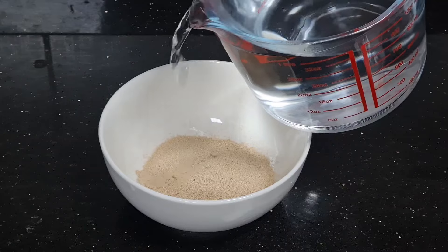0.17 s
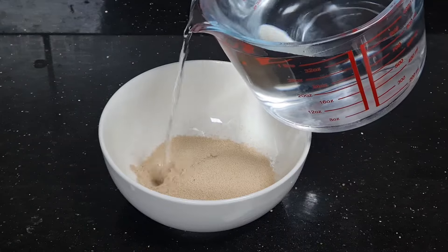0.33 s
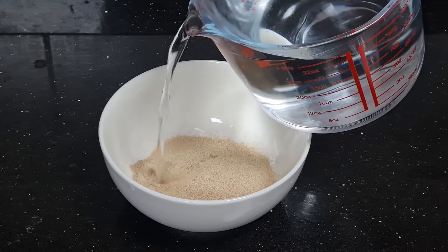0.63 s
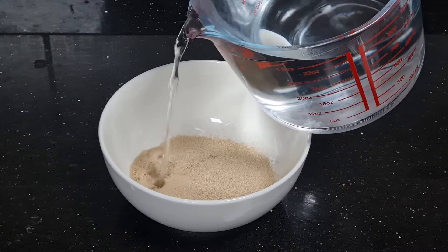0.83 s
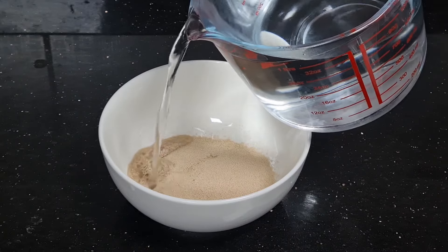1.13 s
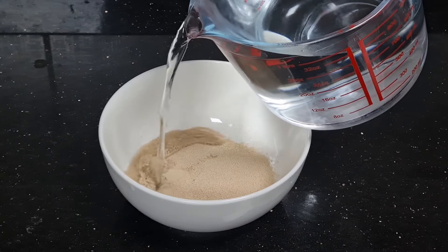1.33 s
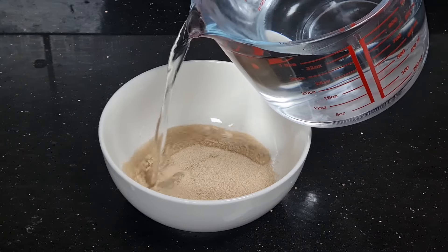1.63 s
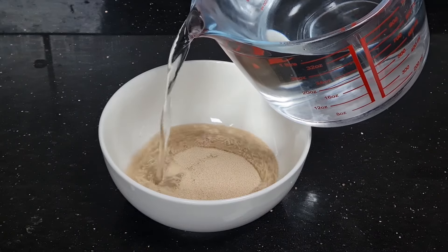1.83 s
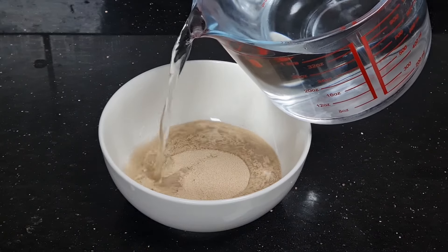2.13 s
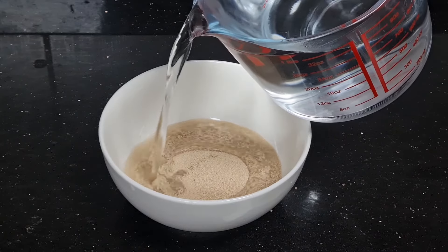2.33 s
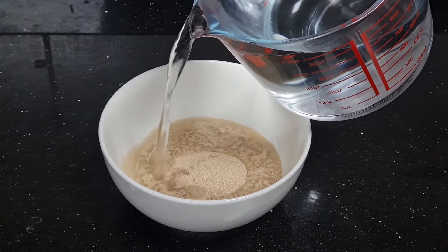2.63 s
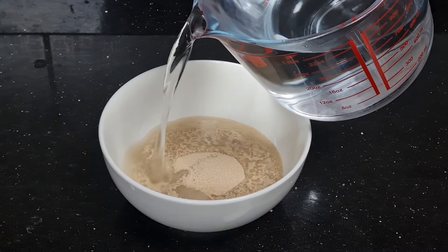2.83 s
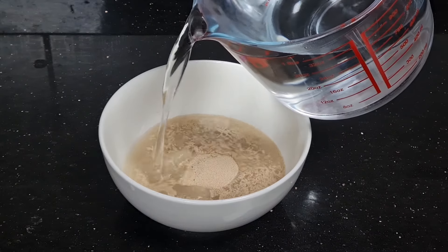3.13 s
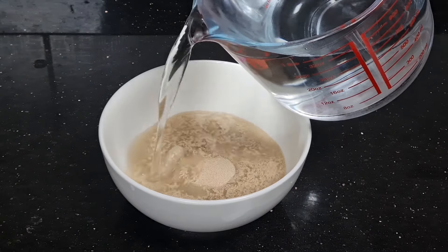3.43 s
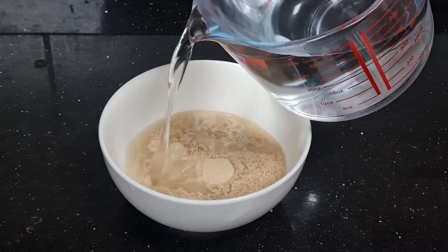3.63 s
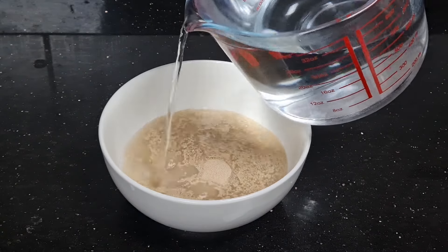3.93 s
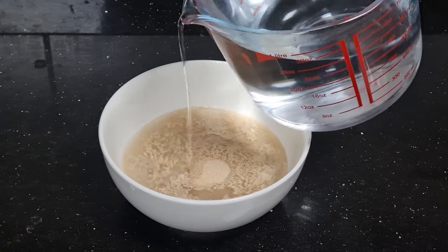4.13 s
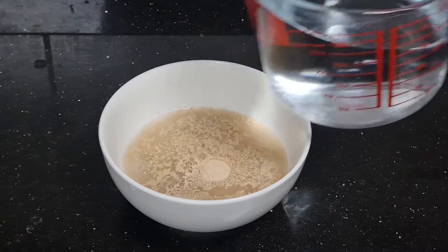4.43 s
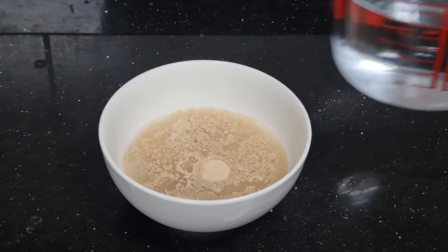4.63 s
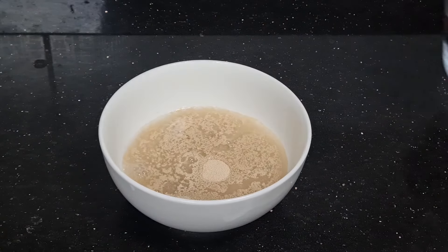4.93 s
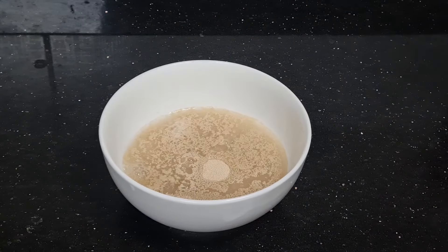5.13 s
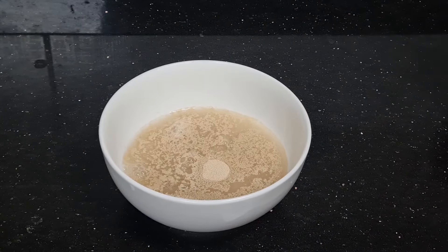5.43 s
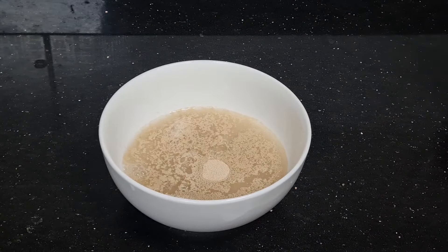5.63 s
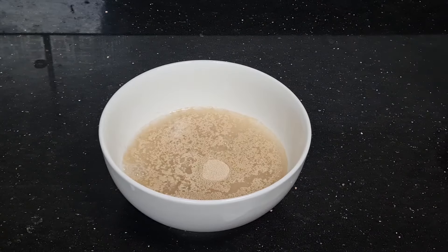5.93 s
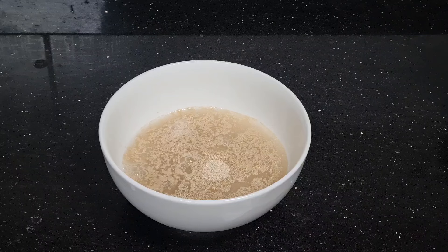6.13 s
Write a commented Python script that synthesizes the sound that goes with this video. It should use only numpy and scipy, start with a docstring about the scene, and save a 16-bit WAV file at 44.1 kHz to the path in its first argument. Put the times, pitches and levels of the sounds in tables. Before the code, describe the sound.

In a quiet kitchen with a low appliance hum, a ceramic bowl gives a short hard clink. A thin stream of water then patters, gurgles and bubbles into it, growing fuller, with a soft bowl knock midway. The pour stops with a few low sloshes. After a pause, a glass jug lands on the stone counter with loud ringing knocks and a gritty scrape. Close stereo microphone, small room.

```python
"""Appliances hum under soft room air: resonated noise and banded noise, all the way through.
A ceramic bowl is knocked at the start and again midway, as decaying modes over a noisy counter knock.
A thin stream of water splats (noise bursts), sprays and gurgles (clicked resonances) and bubbles (rising
sines) in the bowl, with late low surges. Then the glass jug drags and ticks on the stone counter, is set
down with ringing glass modes and rocks. A close pair of microphone ports listens."""
import sys
import numpy as np
from scipy import signal
from scipy.io import wavfile
from scipy.ndimage import uniform_filter1d

SR = 44100
rng = np.random.default_rng(int(sys.argv[2]) if len(sys.argv) > 2 else 0)


def master_out(mix):
    """Clip the mix to full scale and print it as 16-bit PCM to the path in sys.argv[1]."""
    frames = np.transpose(np.atleast_2d(mix))
    ceiling = np.clip(frames, -1, 1)
    pcm = np.round(ceiling * 32767).astype(np.int16)
    wavfile.write(sys.argv[1], SR, pcm)


N = 277036

# how alike the two microphone ports hear each pitch: (f/Hz, likeness 0 to 1)
PORT_LIKENESS = [(40, .998), (170, .985), (350, .65), (700, .35), (1500, .15), (5000, .03)]


def from_db(db):
    """Decibels to amplitude gain."""
    return 10 ** (np.asarray(db) / 20)


def rms_one(x):
    """Scale to rms 1."""
    return x / np.sqrt(np.mean(x ** 2) + 1e-20)


def in_time(rows):
    """Level curves in dB, joined by straight lines; -120 dB outside their span."""
    s, *columns = np.transpose(rows)
    t = np.arange(N) / SR
    return [np.interp(t, s, column, left=-120, right=-120) for column in columns]


def at_hz(points, hz):
    """Read a curve on a log-frequency axis."""
    points = np.array(points)
    return np.interp(np.log(hz), np.log(points[:, 0]), points[:, 1])


def likeness_at(hz):
    """Likeness of the two ports at a pitch, kept between 0 and 1."""
    return np.clip(at_hz(PORT_LIKENESS, hz), 0, 1)


def drift(rate_hz):
    """Slow random wander of rms 1: noise through two equal poles, made at every 40th sample."""
    r = np.exp(-80 * np.pi * rate_hz / SR)
    white = rng.standard_normal(N // 40 + 2002)
    slow = signal.lfilter([1], [1, -2 * r, r * r], white)[2000:]   # drop the filter's run-in
    return np.interp(np.arange(N) / 40, np.arange(len(slow)), rms_one(slow))


def resonance(x, hz, width_hz):
    """Two-pole resonance with a gain of about 1 at its peak."""
    r = np.exp(-np.pi * width_hz / SR)
    zeros = np.array([1, 0, -1]) * (1 - r * r) / 2
    return signal.lfilter(zeros, [1, -2 * r * np.cos(2 * np.pi * hz / SR), r * r], x)


def bandpass(x, low_hz, high_hz):
    """Second-order Butterworth band."""
    return signal.sosfilt(signal.butter(2, [low_hz, high_hz], "band", fs=SR, output="sos"), x)


def pair(mid, side, hz):
    """Left and right from two noises, as alike as the ports hear that pitch."""
    alike = likeness_at(hz)
    return (np.sqrt(1 + alike) * mid + np.sqrt(1 - alike) * side * [[1], [-1]]) / np.sqrt(2)


def banded_noise(spectrum, white, patchy_db):
    """Half-octave bands of two excitations in turn, each with its own level and flicker; rms 1."""
    out = 0
    edges_hz = 23 * 2 ** np.arange(0, 10, .5)
    for k, (low, high) in enumerate(zip(edges_hz, edges_hz[1:])):
        hz = np.sqrt(low * high)
        if spectrum[0][0] < hz < spectrum[-1][0]:
            mid, side = bandpass(white[k % 2], low, high)
            level_db = at_hz(spectrum, hz) + patchy_db * drift(2.13)
            out = out + from_db(level_db) * pair(mid, side, hz)
    return rms_one(out)


def add(out, s, sound, pan_db):
    """Mix a short sound in at a moment; positive pan leans left."""
    i = round(s * SR)
    panned = sound * from_db([[pan_db / 2], [-pan_db / 2]])
    out[:, i:i + sound.shape[-1]] += panned[:, :N - i]


def fading(t60, seconds, rise_s):
    """Envelope with a short rise and an exponential fall of 60 dB per t60."""
    t = np.arange(int(seconds * SR)) / SR
    return (1 - np.exp(-t / rise_s)) * from_db(-60 * t / t60)


def room_tone():
    """Broad air noise in flickering bands, and appliance hums as noise through narrow resonances."""
    # colour of the air: (f/Hz, relative level/dB per Hz)
    air_colour = [(12, -41), (20, -12.5), (48, -9), (63, 6.5), (81, -26), (255, -9.5), (301, -20),
                  (485, -23.5), (574, -24), (1060, -25.5), (1910, -32), (2320, -39.5), (2750, -31.5),
                  (5680, -83.5)]
    # appliance hums: (f/Hz, width of each of two resonances/Hz, rms level/dB)
    hums = [(50.16, 9.5, -45.5), (112, 15.4, -53.5), (163.5, 32, -57.5), (240.9, 17, -53.5),
            (267.8, 9.1, -51.5), (501.5, 10.6, -66.5), (1018, 72, -61.5)]
    air_db = -44.5
    out = from_db(air_db) * banded_noise(air_colour, rng.standard_normal((2, 2, N)), patchy_db=1.4)
    for hz, width_hz, level_db in hums:
        white = rng.standard_normal((2, N))
        mid, side = resonance(resonance(white, hz, width_hz), hz, width_hz)
        out = out + from_db(level_db) * rms_one(pair(mid, side, hz))
    return out


def struck(modes, scatter_db, free=1, split=0, hardness_hz=20000):
    """One blow: every mode rings, beating with its twin where the vessel is not quite round (split > 0)."""
    longest_t60 = np.max(modes, 0)[2]
    t = np.arange(int(min(.6, 1.2 * free * longest_t60) * SR)) / SR
    out = 0
    luck_and_twin = rng.standard_normal((len(modes), 2))
    for (hz, level_db, t60), (luck, twin) in zip(modes, luck_and_twin):
        port_phase = 0.84 * np.arccos(likeness_at(hz)) * np.array([[.5], [-.5]])
        softening = (1 + (hz / hardness_hz) ** 4) ** .5   # a soft contact drives the high modes less
        size = from_db(level_db + scatter_db * luck - 60 * t / t60 / free) / softening
        beat = 1 + .9 * np.sin(2 * np.pi * split * hz * t + twin) * (split > 0)
        out = out + size * beat * np.sin(2 * np.pi * hz * t + port_phase)
    return out * (1 - np.exp(-t / 0.0022))


def blows(events, body, split, reach):
    """Each contact: the counter knocks and thuds, the edge cracks; the vessel rings until the grip damps it."""
    # modes of the stone counter, low thud and knock: (f/Hz, relative level/dB, t60/s)
    thud_modes = [(56.3, -11, 0.35), (137.3, 4, 0.097), (166, 4.5, 0.077), (264, 4, 0.053)]
    knock_modes = [(336, -1.5, 0.095), (388.5, 2.5, 0.099), (495, 4.5, 0.086), (580, 5.5, 0.057),
                   (676, 21, 0.022), (660, -28, 0.06), (772, 4.5, 0.094), (868, 19, 0.016),
                   (1160, -0.5, 0.09), (1208, -8.5, 0.11), (1413, 6, 0.081), (1586, 0.5, 0.071),
                   (2037, 13, 0.017), (2160, -28, 0.027)]
    knock_modes_db = -8.5   # against the noisy knock
    knocks, rings = np.zeros((2, 2, N))
    for s, knock_db, thud_db, crack_db, ring_db, free, hardness_hz, pan_db in events:
        free = np.clip(free, .1, 1.5)
        mid, side, *edge = rng.standard_normal((4, int(.3 * SR)))
        # noisy knock: a quick hit and a slower body
        dull_fade = fading(0.048, .3, 0.0002) + 0.72 * fading(0.17 * free ** .5, .3, 0.0033)
        dull = bandpass(pair(mid, side, 800), 300, hardness_hz) * dull_fade
        # crack: a coloured core and a shorter bright edge
        core = resonance(resonance(np.array(edge), 5500, 1500), 5300, 3000)
        crack = core * fading(.08, .3, .0004)
        crack = crack + 0.13 * np.diff(edge, prepend=0) * fading(0.02, .3, 0.0005)
        add(knocks, s, from_db(knock_db) * dull + from_db(crack_db) * crack, pan_db)
        counter = struck(knock_modes, 0.82, free ** .5, hardness_hz=hardness_hz)
        add(knocks, s, from_db(knock_db + knock_modes_db) * counter, pan_db)
        add(knocks, s, from_db(thud_db) * struck(thud_modes, 0.94), pan_db)
        # the vessel's modes are driven up to about reach times the hardness of the contact
        vessel = struck(body, 0.29, free, split, reach * hardness_hz)
        add(rings, s, from_db(ring_db) * vessel, pan_db)
    return knocks, rings


def bowl_clinks():
    """The ceramic bowl is knocked: counter knocks, and the bowl's own modes without beating."""
    # contacts: (t/s, knock level/dB, thud level/dB, crack level/dB, ring level/dB,
    # share of free ring time, hardness/Hz, pan/dB)
    contacts = [(0.001, -18, -29.5, -48, -22.5, 0.33, 4170, 1),
                (0.0402, -56, -47, -60, -34, 0.84, 1300, -14.5), (2.09, -49, -41, -75, -79, 0.76, 1500, -2),
                (2.412, -32, -69, -63, -43, 0.21, 2340, -3), (2.419, -32, -33, -62, -31, 0.85, 1470, -1.5),
                (2.551, -36.5, -41, -65, -75, 0.54, 1180, -4)]
    # modes of the ceramic bowl: (f/Hz, relative level/dB, t60/s)
    bowl_modes = [(382, -5.5, 0.1), (790, 0, 0.067), (1112, -1.5, 0.17), (1603, -3.5, 0.09),
                  (2114, 1, 0.075), (2730, -1, 0.13), (2731, 0, .62), (5394, -11, .2), (3332, -6, 0.1),
                  (3840, -33, 0.07), (4920, -1, 0.071), (7700, -24, 0.037), (8850, -27, 0.061),
                  (9800, -24, 0.096), (10650, -16, 0.12), (12400, -6, 0.16), (13800, -3, 0.12)]
    return blows(contacts, bowl_modes, split=0, reach=1.87)


def bursts(events):
    """Sharp ticks over longer gritty tails, each of a coloured noise core and a broad hiss."""
    out = np.zeros((2, N))
    for s, core_db, hz, hiss_db, t60, pan_db in events:
        noise = rng.standard_normal((3, int(.2 * SR)))
        grit = from_db(3.6 * rms_one(uniform_filter1d(noise[2], size=90)))   # uneven loudness
        core = rms_one(resonance(resonance(noise[:2], hz, 0.15 * hz), hz, .5 * hz))
        hiss = signal.sosfilt(signal.butter(2, 6000, "high", fs=SR, output="sos"), noise[:2])
        burst = from_db(core_db) * core + from_db(hiss_db) * hiss
        envelope = 0.77 * fading(0.031, .2, 0.0003) + 0.54 * grit * fading(t60, .2, 0.0027)
        add(out, s, burst * envelope, pan_db)
    return out


def splats():
    """The stream breaks in bursts: loud ones are short, soft ones drawn out, a little left or right."""
    # splats: (t/s, coloured core level/dB, core f/Hz, broad hiss level/dB)
    splat_events = [(0.094, -61.5, 9200, -77), (0.4787, -51.5, 8500, -53), (0.5465, -64, 12100, -51.5),
                    (0.837, -56.5, 6800, -47), (0.9775, -63, 13400, -57), (1.0153, -55.5, 4030, -51.5),
                    (1.093, -62, 6400, -80), (1.1314, -60, 6500, -66), (1.1823, -58.5, 4500, -93),
                    (1.236, -84, 12000, -65), (1.279, -59, 4960, -79), (1.3284, -58, 4700, -74),
                    (1.3545, -59, 6840, -46.5), (1.394, -60, 14400, -54), (1.4234, -60, 6250, -51),
                    (1.459, -59, 7500, -79), (1.741, -58, 9700, -79), (1.8009, -69, 11700, -55.5),
                    (1.8236, -53, 7380, -61), (1.8488, -53.5, 4830, -44), (1.8683, -49, 9000, -68),
                    (1.904, -44, 6600, -45), (1.922, -63, 6460, -42), (2.0765, -57.5, 5200, -58.5),
                    (2.032, -80, 13000, -66), (2.2244, -64, 12200, -64), (2.237, -51.5, 6200, -55),
                    (2.3042, -60, 6400, -80), (2.4495, -47.5, 9000, -52), (2.5167, -47.5, 7200, -45.5),
                    (2.541, -53, 14600, -60), (2.62, -55, 4830, -84), (2.7815, -54.5, 6150, -89),
                    (2.901, -48.5, 3700, -87), (2.9856, -44, 3820, -38.5), (3.137, -60, 4830, -53),
                    (3.1566, -41.5, 6630, -38), (3.2973, -56.5, 5750, -72), (3.4063, -53.5, 6550, -57),
                    (3.535, -77, 13100, -83), (3.62, -75, 10100, -66), (3.694, -52, 6500, -41),
                    (3.7457, -51, 8900, -40), (3.7942, -45, 3570, -47.5), (3.919, -71, 14000, -72),
                    (4.001, -55, 9600, -63), (4.0512, -56.5, 6990, -45), (4.074, -66, 12300, -42),
                    (4.1234, -61, 8550, -40), (4.2204, -55, 3900, -59), (4.2403, -57, 9600, -68),
                    (4.2997, -52, 3900, -46), (4.363, -50, 3630, -59), (4.396, -51.5, 4070, -52),
                    (4.465, -72, 12000, -64)]
    loud_t60_s, loud_db = 0.11, -42   # tail of a loud splat, at this level
    shortening = 0.14   # dB of t60 per dB of level
    pan_scatter_db = 3
    s, core_db, hz, hiss_db = np.transpose(splat_events)
    stronger_db = np.maximum(core_db, hiss_db)
    t60 = loud_t60_s * from_db(-shortening * (stronger_db - loud_db))
    pan_db = pan_scatter_db * rng.standard_normal(len(s))
    return bursts(zip(s, core_db, hz, hiss_db, t60, pan_db))


def grains(per_s, spread_db, channels):
    """Trains of random clicks: uneven sizes, either sign."""
    draw = rng.uniform(-1, 1, (channels, N)) / (per_s / SR)
    hit = np.abs(draw) < 1
    out = np.zeros((channels, N))
    boost = np.minimum(-np.log(np.abs(draw[hit])), 4)   # mostly small, a few large
    out[hit] = np.sign(draw[hit]) * from_db(spread_db * boost)
    return out


def ring(clicks, hz, t60):
    """A unit click sets a decaying sine of height 1 ringing."""
    r, w = from_db(-60 / (t60 * SR)), 2 * np.pi * hz / SR
    return signal.lfilter([0, np.sin(w)], [1, -2 * r * np.cos(w), r * r], clicks + 1e-18)


def droplets(pitches_hz, per_s, cycles):
    """Random drops ring short resonances (60 dB down after so many cycles), in or out of phase at the ports."""
    born = grains(per_s / len(pitches_hz), 1.7, channels=1)[0]
    out = 0
    for k, hz in enumerate(pitches_hz):
        drops = np.roll(born, 9973 * k)   # the same train, shifted for each pitch
        out = out + ring(drops, hz, cycles / hz) * [[1], [(-1) ** k]]
    return rms_one(out)


def surges():
    """Level of the stirred pool in dB: each late surge swells to its peak and drops away."""
    # surges: (t/s, peak level/dB)
    swells = [(3.808, -52.5), (4.184, -44.5), (4.4, -51)]
    rise_db_per_s, fall_db_per_s = 101, 228
    s, peak_db = np.transpose(swells)[:, :, None]
    late = np.arange(N) / SR - s
    return np.max(peak_db + np.minimum(rise_db_per_s * late, -fall_db_per_s * late), axis=0)


def stream():
    """Clumped spray with tiny droplets, a gurgle near the bowl's air resonances, a low surging slosh."""
    # the pour: (t/s, spray level/dB, gurgle level/dB)
    pour_levels = [(0.3, -110, -115), (0.47, -57.5, -60.5), (0.65, -77, -84), (0.84, -69, -85),
                   (1.0, -79, -83), (1.3, -68.5, -65.5), (1.6, -77, -64), (1.87, -60.5, -65.5),
                   (2.04, -82, -66.5), (2.27, -64, -59.5), (2.42, -66, -60), (3.09, -70, -59),
                   (3.31, -66, -57.5), (3.45, -71.5, -69), (3.65, -67, -56.5), (3.9, -64.5, -64),
                   (4.12, -53.5, -53.5), (4.4, -65, -71), (4.75, -78, -93)]
    # colour of the spray: (f/Hz, relative level/dB per Hz)
    spray_colour = [(2350, -35), (4000, 0), (5760, -1.5), (7750, -5), (8400, -28), (10800, -39.5),
                    (15100, 7), (16000, -10)]
    spray_db, gurgle_db = in_time(pour_levels)
    clumped_per_s = 2500 * from_db(8.8 * drift(22))
    clicks = grains(clumped_per_s, 2.9, channels=4).reshape(2, 2, N)
    spray = banded_noise(spray_colour, clicks, patchy_db=4.5)
    spray = spray + 0.082 * droplets(np.geomspace(4300, 9500, 7), per_s=200, cycles=110)
    gurgle = droplets([1943, 2170, 2963, 3020, 3210, 3880], per_s=410, cycles=55)
    slosh = droplets([460, 615, 740, 1070, 1420], per_s=260, cycles=4.4)
    return from_db(spray_db) * spray + from_db(gurgle_db) * gurgle + from_db(surges()) * slosh


def bubbles():
    """Bubbles trapped under the stream: each rings briefly as a sine and rises a little in pitch."""
    # bubbles: (t/s, nominal peak level/dB, starting f/Hz)
    bubble_events = [(0.4955, -44, 1875), (0.767, -49, 1910), (0.9543, -38.5, 1920), (1.0157, -49.5, 3200),
                     (1.3553, -44, 1880), (1.6548, -43, 1890), (1.7231, -47, 1880), (1.9062, -50, 2960),
                     (2.0783, -48, 3050), (2.203, -40.5, 1940), (2.2255, -45, 1890), (2.3777, -45, 1510),
                     (2.7582, -51, 1890), (2.8286, -47, 1920), (2.8426, -42.5, 2990), (2.9036, -48, 3070),
                     (2.9877, -43, 2080), (3.1379, -43, 2030), (3.1628, -42.5, 1860), (3.312, -53, 2070),
                     (3.3993, -45, 1870), (3.5894, -43, 2980), (3.6477, -41, 1920), (3.701, -37, 2040),
                     (3.7475, -43, 1870), (3.7709, -40, 2090), (3.7983, -39, 1880), (3.9186, -48, 2080),
                     (4.0099, -45, 2100), (4.0328, -43, 1850), (4.0772, -40, 2090), (4.1531, -40.5, 2050),
                     (4.1905, -44.5, 2050), (4.2219, -43, 1880), (4.309, -49, 3000), (4.3446, -46, 3800),
                     (4.363, -52, 3730), (4.4025, -53, 3700)]
    t60_s, phase_rise_per_s = 0.047, 0.97   # pitch climbs by twice this fraction per second
    t = np.arange(int(.15 * SR)) / SR
    port_phase = np.array([[.6], [-.6]])
    out = np.zeros((2, N))
    for s, peak_db, hz in bubble_events:
        tone = np.sin(2 * np.pi * hz * t * (1 + phase_rise_per_s * t) + port_phase)
        add(out, s, from_db(peak_db) * tone * fading(t60_s, .15, 0.00008), .8)
    return out


def slide():
    """Grit under the jug's glass foot: clicks through a thin bright rustle and a broad scrape."""
    # the drag: (t/s, thin rustle level/dB, broad grit level/dB)
    drag_levels = [(5.05, -92, -95), (5.324, -78, -87), (5.46, -61, -49), (5.6, -81, -85),
                   (5.816, -82, -67), (5.9, -51, -46), (6.01, -49.5, -60), (6.052, -79, -69),
                   (6.19, -67.5, -86), (6.28, -95, -90)]
    rustle_hz, width_hz = 6900, 480   # the same resonance twice
    rustle_db, grit_db = in_time(drag_levels)
    grit = grains(6500, 0.86, channels=2)
    rustle = resonance(resonance(grit, rustle_hz, width_hz), rustle_hz, width_hz)
    scrape = resonance(grit[:, ::-1], 4000, 7100)   # reversed grains, so the two layers differ
    return from_db(rustle_db) * rms_one(rustle) + from_db(grit_db) * rms_one(scrape)


def jug_ticks():
    """Small bright ticks of the jug on the stone, as noise bursts."""
    # ticks: (t/s, coloured core level/dB, core f/Hz, broad hiss level/dB, t60/s, pan/dB)
    tick_events = [(5.29, -54.5, 7100, -91, 0.066, -1), (5.3703, -50, 6900, -87, 0.057, -1),
                   (5.7662, -55, 9400, -39.5, 0.057, 0), (5.906, -36, 7000, -35, 0.11, -2),
                   (5.9544, -60, 7300, -61, 0.08, 1), (5.9726, -45, 8500, -41, 0.14, -1)]
    return bursts(tick_events)


def jug_set_down():
    """The jug lands and rocks on the counter: knocks, and glass modes that beat with their twins."""
    # contacts: (t/s, knock level/dB, thud level/dB, crack level/dB, ring level/dB,
    # share of free ring time, hardness/Hz, pan/dB)
    contacts = [(5.43, -10, -15, -26, -24, 0.88, 2010, 0.8), (5.468, -17, -22, -27, -29, 0.42, 1090, -0.5),
                (5.529, -13.5, -19.5, -27.5, -39.5, 0.84, 1370, -0.2),
                (5.562, -49, -26.5, -45, -59, 0.97, 1190, 1.5), (5.575, -35, -25.5, -46, -63, 1, 1200, 0),
                (5.846, -7.5, -25, -14.5, -24, 0.18, 1910, 0.3),
                (5.878, -41, -55, -44, -31.5, 0.19, 2500, 1), (6.062, -33, -48, -70, -67, 0.79, 1050, -2.5)]
    # modes of the glass jug: (f/Hz, relative level/dB, t60/s)
    jug_modes = [(1046, -7, .25), (1418, -7, .15), (1480, 6, .34), (2120, -4, .17), (1860, -14, .1),
                 (2460, -16, .1), (2720, -24, .2), (3370, -15, .35), (5228, -8, .1), (5515, -3, .24),
                 (5930, -18, .2), (6240, -20, .2), (7806, -22, .17), (8096, -21, .2), (9092, -21, .15),
                 (9593, -19, .25), (10400, -24, .11), (10870, -22, .25), (12250, -26, .1), (12980, -26, .2),
                 (13820, -28, .15), (14630, -28, .18)]
    return blows(contacts, jug_modes, split=0.0038, reach=5.0)   # split: beat rate over mode pitch


def kitchen(x):
    """Reflections: a dying noise tail of unit energy for each side, dull from the walls."""
    t60_s, wall_cut_hz = 0.27, 5900
    tail = rng.standard_normal((2, int(.6 * SR))) * fading(t60_s, .6, .006)
    tail = bandpass(tail, 300, wall_cut_hz)
    tail = tail / np.sqrt(np.sum(tail ** 2, axis=1, keepdims=True))
    return signal.fftconvolve(x, tail, axes=1)[:, :N]


def scene():
    """Near sources with their reflections, the close ring of the vessels, the room tone."""
    kitchen_db = -9.5
    bowl_knocks, bowl_ring = bowl_clinks()
    jug_knocks, jug_ring = jug_set_down()
    water = splats() + stream() + bubbles()
    near = bowl_knocks + water + slide() + jug_ticks() + jug_knocks
    return room_tone() + near + from_db(kitchen_db) * kitchen(near) + bowl_ring + jug_ring


def record(dry):
    """Faint preamplifier hiss, brightened by differencing white noise; then a steep cut of the top."""
    noise_db, cutoff_hz = -92, 16700   # noise before differencing; 70 dB down from the cutoff up
    hiss = np.diff(from_db(noise_db) * rng.standard_normal((2, N + 1)))
    return signal.sosfilt(signal.cheby2(16, 70, cutoff_hz, fs=SR, output="sos"), dry + hiss)


dry = scene()
out = record(dry)
master_out(out)
```